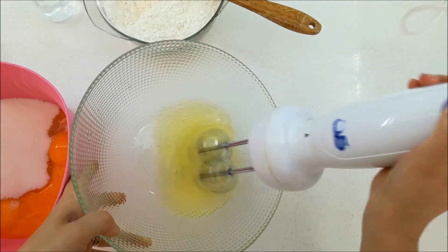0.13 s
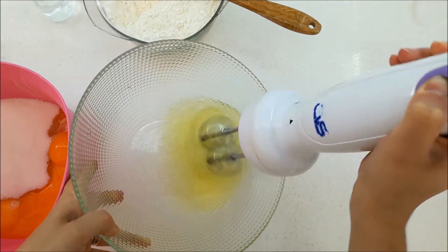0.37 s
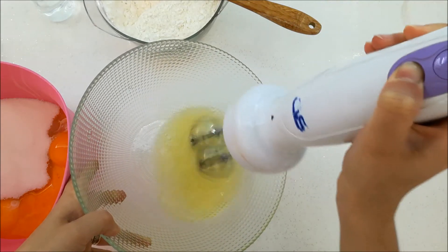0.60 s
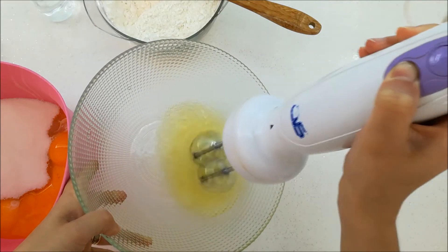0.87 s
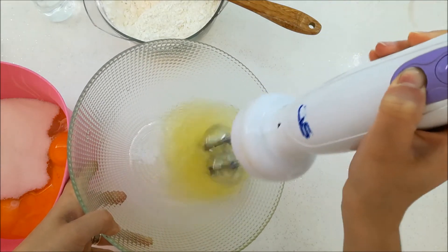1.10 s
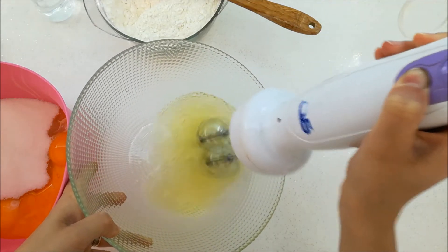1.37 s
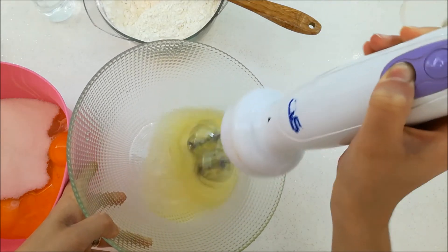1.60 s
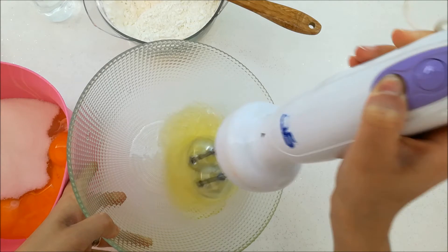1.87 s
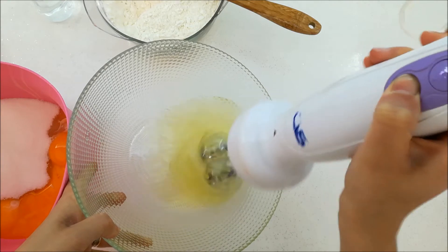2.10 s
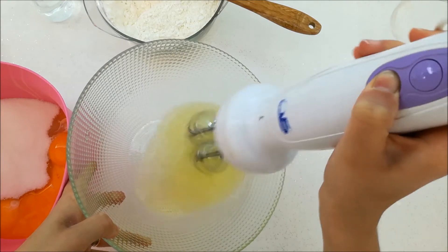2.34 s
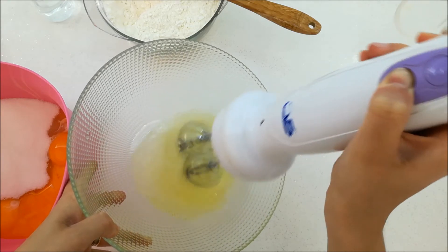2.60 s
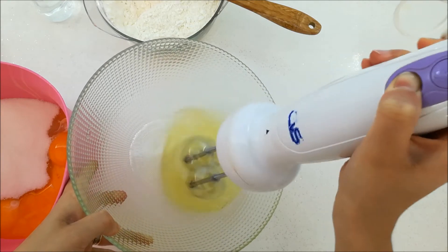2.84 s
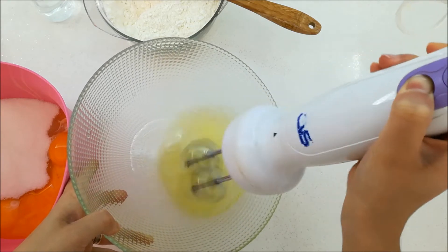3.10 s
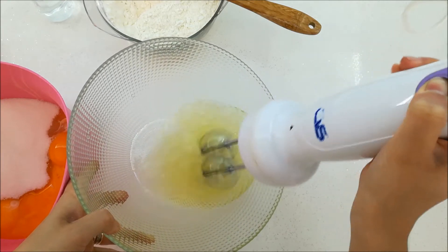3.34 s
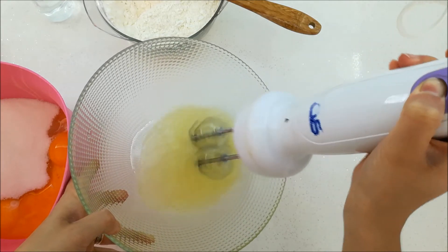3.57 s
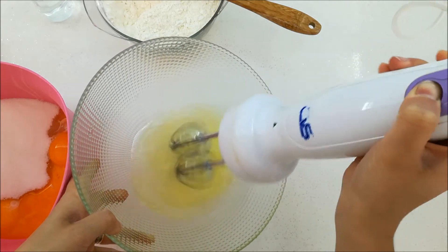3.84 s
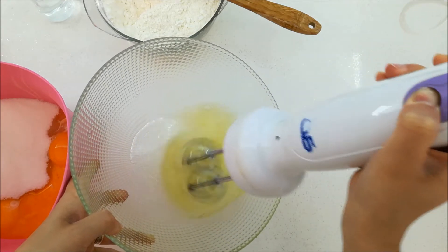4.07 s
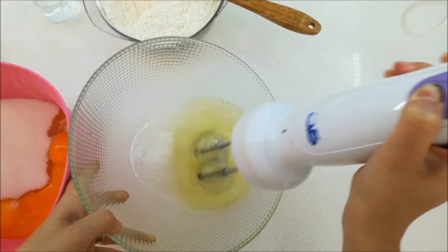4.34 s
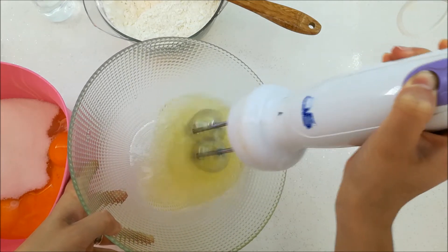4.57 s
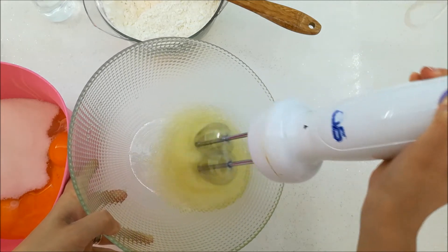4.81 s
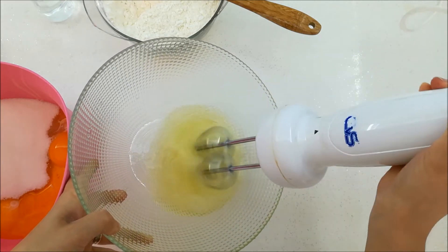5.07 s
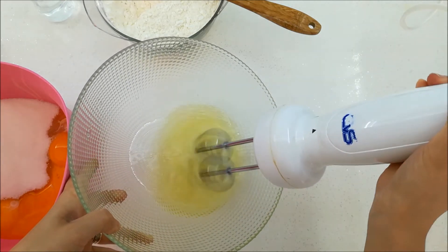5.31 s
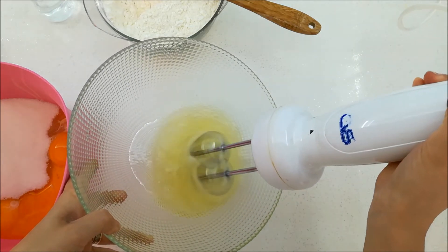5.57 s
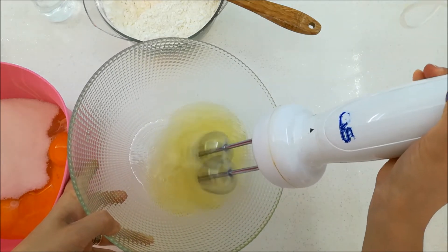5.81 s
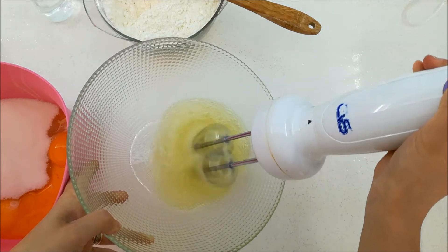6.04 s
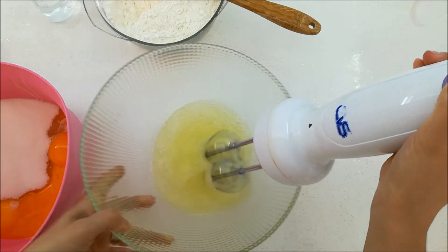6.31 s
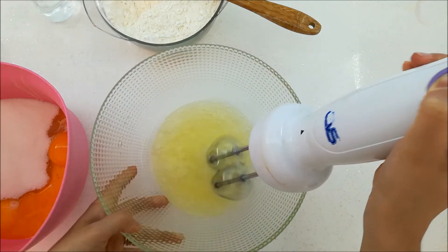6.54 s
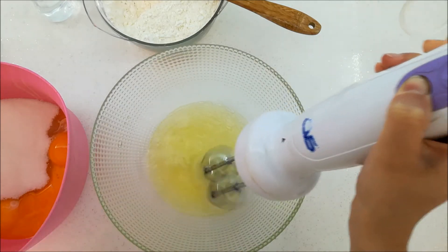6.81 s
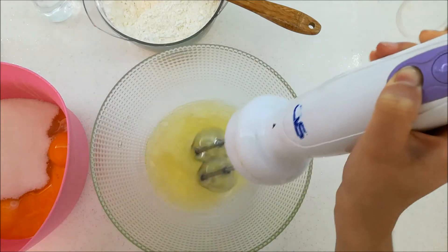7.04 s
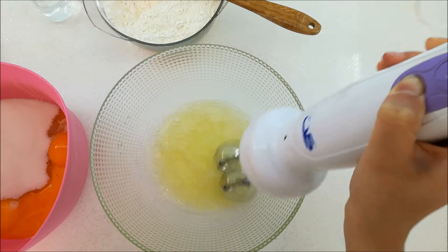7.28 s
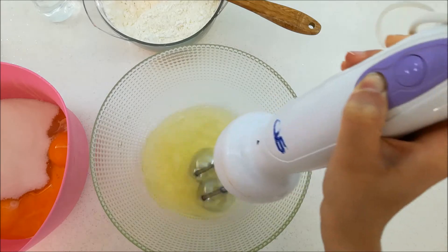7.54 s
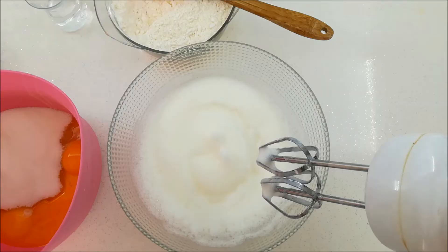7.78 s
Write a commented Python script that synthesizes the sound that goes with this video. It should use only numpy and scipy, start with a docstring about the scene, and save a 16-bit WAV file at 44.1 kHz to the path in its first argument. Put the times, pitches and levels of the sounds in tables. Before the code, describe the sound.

An electric hand mixer whines and hisses steadily, left of centre, its beaters rattling in bursts against a glass bowl before cutting abruptly to near silence.

```python
"""Hand mixer whisking egg whites

An electric hand mixer runs near a pair of microphones, mostly to the left, over a glass bowl.
Its motor whines as sines on shaft orders and hisses as filtered noise in puffs once a turn.
While the beater wires are pressed down, their taps excite resonances of the bowl and the worktop;
hard contacts add knocks and rim pings. At the end the sound is turned down in steps to a quiet kitchen."""
import sys
import numpy as np
from scipy import signal
from scipy.fft import rfft, irfft, next_fast_len
from scipy.io import wavfile
from scipy.ndimage import uniform_filter1d, map_coordinates

SR = 44100
rng = np.random.default_rng(int(sys.argv[2]) if len(sys.argv) > 2 else 0)


def dump(signal):
    """Clip the signal to [-1, 1] and save it as 16-bit WAV at the path in sys.argv[1]."""
    limited = np.clip(np.atleast_2d(signal).T, -1, 1)
    pcm = np.round(limited * 32767).astype(np.int16)
    wavfile.write(sys.argv[1], SR, pcm)


def attenuation_scalar(level_db):
    """Turn a level in dB into a linear amplitude multiplier (20 dB per decade)."""
    decades = np.asarray(level_db, float) / 20
    return 10 ** decades


N = 348831

# Motor shaft: (time [s], rotation rate [turns/s], order favoured by the grip on the housing [1])
SHAFT = [(0, 195.5, 8.5), (.2, 197.4, 8), (.72, 198.7, 9.8), (1.89, 199.2, 9.2), (4.01, 199.8, 9.3),
         (5.32, 199.8, 9), (6.07, 199.8, 8.5), (7.24, 201.6, 8.2), (7.64, 202, 8.2)]
# Beaters pressed on the bowl: (touch [s], lift [s], relative pressure [dB], relative landing knock [dB])
STROKES = [(0, 0.366, -47, -47), (0.599, 0.777, -46.5, -35), (0.901, 1.127, -48, -35.5),
           (1.271, 1.45, -46.5, -36), (1.588, 1.776, -47.5, -43), (1.97, 2.123, -45.5, -32.5),
           (2.149, 2.204, -47.5, -36), (2.313, 2.448, -46, -31), (2.601, 2.75, -48.5, -39.5),
           (2.912, 3.037, -44, -30.5), (3.189, 3.4, -46.5, -30), (3.505, 3.707, -44.5, -31),
           (3.862, 4.057, -49.5, -29.5), (4.171, 4.33, -46, -31.5), (4.501, 6.367, -46.5, -35.5),
           (6.384, 6.54, -47, -23.5), (6.556, 6.987, -51.5, -38), (7.024, 7.296, -49, -39),
           (7.302, 7.912, -52, -46)]
# Likeness of the sound at the two sides: (frequency [Hz], likeness [1])
LIKENESS = [(40, 0.94), (130, 1), (290, 0.85), (640, 0.38), (1500, 0.71), (3100, 0.23), (10000, 0.22),
            (12000, 0.93)]


def unit(x):
    """Normalization to an rms of 1."""
    return x / np.sqrt(np.mean(x ** 2) + 1e-20)


def along(points, hz):
    """Linear interpolation of (frequency [Hz], value) points on a logarithmic frequency axis."""
    f, v = np.transpose(points)
    return np.interp(np.log(hz + 1), np.log(f + 1), v)


def curves(rows):
    """Linear interpolation in time: one value per sample for each column after the time."""
    s, *columns = np.transpose(rows)
    return [np.interp(np.arange(N) / SR, s, column) for column in columns]


def wobble(rate):
    """Band-limited random fluctuation: a smooth curve through random knots, rate of them a second."""
    coarse = np.arange(0, N + SR // 1000, SR // 1000)  # about one point a millisecond
    knots = rng.standard_normal(int(N * rate / SR) + 5)
    return np.interp(np.arange(N), coarse, map_coordinates(knots, [coarse * rate / SR]))


def white():
    """White noise: independent random samples for two channels."""
    return rng.standard_normal((2, N))


def filtered(x, response):
    """Linear filtering: the spectrum of x times a complex response of frequency."""
    m = next_fast_len(N + SR // 4)
    return irfft(rfft(x, m) * response(np.fft.rfftfreq(m, 1 / SR)), m)[..., :N]


def ringing(x, modes):
    """Modal superposition: causal damped resonances with alternating signs, excited by x."""
    def response(f):
        return sum((-1) ** k * attenuation_scalar(db) * 1j * f * width / (centre ** 2 - f ** 2 + 1j * f * width)
                   for k, (centre, width, db) in enumerate(modes))
    return filtered(x, response)


def hiss(spectrum, noise, patchy_db=0):
    """Partial coherence: sum and difference of two noises give a pair of rms 1 with drifting colour."""
    z = signal.stft(noise, nperseg=256)[2]
    field = uniform_filter1d(rng.standard_normal(z.shape[1:]), size=2, axis=0)  # over frequency
    field = uniform_filter1d(field, size=24)  # over time
    pair = signal.istft(z * attenuation_scalar(patchy_db * unit(field)), nperseg=256)[1][:, :N]

    def response(hz):
        half_angle = np.arccos(np.clip(along(LIKENESS, hz), 0, 1)) / 2
        return attenuation_scalar(along(spectrum, hz)) * [np.cos(half_angle), np.sin(half_angle)]
    mid, side = filtered(pair, response)
    return unit(np.array([mid + side, mid - side]))


def kitchen():
    """Ambient noise: steady broadband noise of the quiet kitchen."""
    # (frequency [Hz], relative density [dB per Hz])
    room = [(25, -4), (45, 2), (130, -7), (300, -17), (1000, -22), (3000, -39)]
    return attenuation_scalar(-76) * hiss(room, white())


def rumble():
    """Low-frequency noise: a steady random rumble beneath the mixer."""
    # (frequency [Hz], relative density [dB per Hz])
    low = [(25, -14.5), (45, 5), (75, -5), (130, 1), (260, -26), (450, -22), (1000, -7.5), (1300, -44.5)]
    return attenuation_scalar(-54.5) * hiss(low, white())


def impulses(events, gain_db):
    """Impulsive excitation: one sample for each (time [s], relative level [dB])."""
    hits = np.zeros(N)
    for s, db in events:
        hits[round(s * SR)] = attenuation_scalar(db + gain_db)
    return hits


def hard_contacts():
    """Impact: hard contacts in mid-stroke and the landing of each stroke, as impulses."""
    # Contacts in mid-stroke: (time [s], relative level [dB])
    knocks = [(.177, -33.5), (.35, -32), (.692, -32), (1.053, -31.5), (3.279, -35), (4.971, -31),
              (6.244, -30), (6.669, -36.5)]
    landings = [(start, db) for start, _, _, db in STROKES]
    return impulses(list(knocks) + landings, 0)


def pressure():
    """Contact force: envelopes on worktop and bowl with a sudden touch and a slower lift."""
    t = np.arange(N) / SR
    touch = np.zeros((2, N))
    for start, lift, db, _ in STROKES:
        ease = np.clip((t - start) / 0.002, 0, 1) * np.clip((lift - t) / 0.13 + .5, 0, 1)
        touch = np.maximum(touch, np.outer(attenuation_scalar([db, db + 2.2]), ease))  # worktop, bowl
    return touch


def wire_taps(wires):
    """Periodic impact with jitter: one tap of uneven size for each wire that passes the glass."""
    # The wire that stands out, row by row worktop and bowl: (extra strength [dB])
    bent_db = [
        [6],
        [1],
    ]
    bent_wire = 1  # which of the four
    at = np.flatnonzero(np.diff(np.floor(wires + .1 * wobble(30))) > 0)
    uneven_db = [[2.4], [1.8]] * rng.standard_normal((2, len(at)))
    taps = np.zeros((2, N))
    taps[:, at] = attenuation_scalar(uneven_db + np.array(bent_db) * (np.round(wires[at]) % 4 == bent_wire))
    return taps


def worktop_shake(wires, touch):
    """Forced vibration: the worktop shakes at the wire rate, more under pressure."""
    level = attenuation_scalar(-64.5) + attenuation_scalar(-8.5) * uniform_filter1d(touch, size=4000)
    return level * attenuation_scalar(2.5 * wobble(5.5)) * np.sin(2 * np.pi * wires)


def worktop_thuds(touch, taps, contacts):
    """Resonance under impact: taps and hard contacts excite the bowl on its stand."""
    # (frequency [Hz], width [Hz], relative level [dB])
    worktop = [(126.7, 10, 5.5), (195.5, 34, -5.5), (233, 42, -9.5)]
    taps = taps + 0.023 * rng.standard_normal(N)
    tapping = touch * taps / np.std(ringing(taps, worktop))
    return ringing(tapping + attenuation_scalar(42) * contacts, worktop)


def rim_pings():
    """Lightly damped resonance: wires catching the rim set off a clear ring of the glass."""
    # Catches: (time [s], relative level [dB])
    pings = [(0.2356, -31.5), (2.087, -34), (4.1788, -33.5), (4.731, -34.5), (4.9037, -34.5), (5.971, -30)]
    # Ring: (frequency [Hz], width [Hz], relative level [dB])
    rim = [(1340, 36, 9)]
    return ringing(impulses(pings, 43), rim)


def glass_bowl(touch, taps, contacts):
    """Modal response to impact and friction: taps, skids and knocks excite the bowl with egg white."""
    # (frequency [Hz], width [Hz], relative level [dB])
    bowl = [(348, 49, -8.5), (514, 88, -6), (640, 42, 1), (744.4, 54, -4.5), (1052, 81, -10)]
    let_go_s, free_db = 6.32, -1  # the steadying hand leaves the rim; the two top modes ring on
    t = np.arange(N) / SR
    t_burst = t[:SR // 20]
    skid = attenuation_scalar(-60 * t_burst / 0.061)  # a wire skids over the ribs for a few ms
    grain = rng.standard_normal(N) + 0.84 * white()  # each side faces another part of the bowl
    friction = (signal.fftconvolve(taps, skid)[:N] + 0.15) * grain
    rattle = friction + attenuation_scalar(26) * taps  # clean tap ahead of the skid
    rattle = touch * rattle / np.std(ringing(rattle, bowl))
    chatter = rng.standard_normal(len(t_burst)) * attenuation_scalar(-15.5 - 60 * t_burst / 0.096)
    blows = attenuation_scalar(34) * contacts
    blows = blows + signal.fftconvolve(blows, chatter)[:N]  # a knock rattles on briefly
    drive = rattle + blows
    free = -attenuation_scalar(free_db) * ringing((t > let_go_s) * drive, bowl[-2:])  # sign as in the whole bowl
    return ringing(drive, bowl) + free


def beaters(turns):
    """Geared rotation: four wires pass the glass each beater turn, with force only while pressed."""
    wires = 4 * turns / 17  # 17 motor turns per beater turn
    touch, taps, contacts = pressure(), wire_taps(wires), hard_contacts()
    return (worktop_thuds(touch[0], taps[0], contacts) + glass_bowl(touch[1], taps[1], contacts)
            + rim_pings() + worktop_shake(wires, touch[0]))


def aim():
    """Source directivity: vent level and left-right gap from the slow hold plus swings on downstrokes."""
    # How the mixer is held: (time [s], relative vent hiss [dB], left over right [dB])
    hold = [(0, -31, 8), (.25, -30, 13), (1.4, -31, 13.5), (2.3, -30.5, 14), (2.8, -31.5, 11),
            (4.45, -32, 11.5), (4.9, -31.5, 8), (6.8, -32.5, 9.5), (7.55, -30, 10.5), (7.66, -31, 7.5)]
    swing_s, late_s = 0.041, 0.042  # Gaussian width of a swing, its delay after the touch
    vent_db, left_db = curves(hold)
    t = np.arange(0, N / SR + .01, .01)
    swing = sum(np.exp(-((t - start - late_s) / swing_s) ** 2 / 2)
                for start, _, _, knock_db in STROKES if knock_db > -44)  # the softest landings give none
    swing = np.interp(np.arange(N) / SR, t, swing)
    return vent_db + 1.5 * swing, left_db + 0.5 * swing  # vents swing to the left


def repeating(turns, share):
    """Cyclic correlation: in two noises each turn of the shaft repeats a share of the turn before."""
    steps = 220  # places around the shaft
    fresh = rng.standard_normal((2, N // steps + 40, steps))
    worn = signal.lfilter([1], [1, -np.clip(share, 0, .9)], fresh, axis=1).reshape(2, -1)
    return np.array([map_coordinates(track, [turns * steps]) for track in worn])


def puffs(turns, depth, grit):
    """Amplitude modulation by rotation: brush and fan noise comes in a puff every turn."""
    pulse = np.cos(2 * np.pi * turns) + .35 * np.cos(2 * np.pi * 2 * turns)
    return np.exp(depth * pulse + grit + 0.025 * wobble(8.8)) * repeating(turns, share=0.19)


def shaft_whine(turns):
    """Harmonic synthesis: sines on shaft orders, each wavering on its own in level and phase."""
    # Lower shaft orders: (order [1], relative level [dB])
    lower = [(3, -57), (4, -57.5), (5, -65), (6, -51.5), (7, -48)]
    favoured = curves(SHAFT)[1]
    # The favoured order is the loudest; a distance of one order costs 2.5 dB
    orders = list(lower) + [(k, -44.5 - 2.5 * (k - favoured) ** 2) for k in range(8, 11)]
    whine = np.zeros((2, N))
    for k, db in orders:
        # Each side hears its own mix of echoes
        level_waver = np.array([wobble(14), wobble(14)])
        phase_waver = np.array([wobble(9), wobble(9)])
        level = attenuation_scalar(db + 3.0 * level_waver * min(k / 7, 1)) * np.sqrt(2)
        whine += level * np.sin(2 * np.pi * (k * turns + 0.022 * k * phase_waver))
    return whine


def motor_noise(turns):
    """Spectral shaping of modulated noise: housing buzz, vent hiss, singing slots and high fizz."""
    # Each spectrum: (frequency [Hz], relative density [dB per Hz])
    housing = [(900, -29), (1150, -5), (1400, 1), (1750, 4), (2100, 2), (2600, -9.5), (3400, -51)]
    vents = [(1470, -22), (2500, -6), (3550, -3.5), (4130, -1), (4750, -2), (5750, -1.5), (7120, -14),
             (8000, -16), (10400, -22), (17600, -120)]
    slots = [(3600, -31.5), (4200, 3.5), (4650, 4), (5100, 3), (5700, -53)]  # air singing in the vent slots
    fizz = [(4120, -15), (7000, 0.5), (10400, -3.5), (13400, -4.5), (15200, 0.5), (15900, -44)]
    vent_db, left_db = aim()
    change_db = vent_db - vent_db.mean()
    grit = 0.08 * wobble(150)  # uneven sparking, shared by all bands
    buzz = attenuation_scalar(-36 + .3 * change_db) * hiss(housing, puffs(turns, 0.15, grit), patchy_db=1.17)
    high = attenuation_scalar(-44.5 + 0.26 * change_db) * hiss(fizz, puffs(turns, 0.1, grit), patchy_db=2.5)
    vent = attenuation_scalar(vent_db + 1.8) * hiss(vents, puffs(turns, 0.23, grit), patchy_db=1.7)
    slot_db = vent_db - 24.5 + 1.48 * left_db  # louder when they face left
    singing = attenuation_scalar(slot_db) * hiss(slots, puffs(turns, 0.15, grit), patchy_db=0.8)
    return buzz + vent + singing + high


def motor(turns):
    """Superposition: tonal shaft orders, noise in puffs and low rumble add up."""
    return shaft_whine(turns) + motor_noise(turns) + rumble()


def microphones(air, bowl):
    """Interaural time and level differences: the left hears the mixer sooner and louder in the treble."""
    # (frequency [Hz], share of the left-right level gap [1])
    gap_share = [(200, 0), (1300, 0.2), (4400, 0.86), (8000, 1.06), (12000, 0.14)]
    # (frequency [Hz], share of the left side's head start [1])
    lead_share = [(200, 0), (1000, 1), (9000, 1), (10500, 0)]
    side = np.array([[1], [-1]])

    def out_of_step(hz):  # the wide bowl reaches both sides out of step
        return np.exp(.6j * side * np.arccos(np.clip(along(LIKENESS, hz), 0, 1)))

    def head_start(hz):  # 0.15 ms between the sides where the share is 1
        return np.exp(1j * np.pi * side * hz * 0.00015 * along(lead_share, hz))
    heard = filtered(air, head_start) + filtered(bowl, out_of_step)
    hz, t, z = signal.stft(heard, SR, nperseg=512)
    share = along(gap_share, hz)[:, None]
    gap_db = share * aim()[1][np.minimum((t * SR).astype(int), N - 1)]
    lean = attenuation_scalar(side[..., None] * gap_db / 2) / np.sqrt(np.cosh(np.log(attenuation_scalar(gap_db))))  # same total power
    # Echoes off hand, bowl and worktop colour each side; the colour drifts as the mixer moves
    bands = uniform_filter1d(rng.standard_normal(z.shape), size=3, axis=1)
    bands = uniform_filter1d(uniform_filter1d(bands, size=90), size=40)
    lean = lean * attenuation_scalar(1.13 * share * unit(bands))
    return signal.istft(z * lean, SR, nperseg=512)[1][:, :N]


def scene():
    """Common rotation: one shaft angle drives mixer and bowl, as both microphones hear them."""
    turns = np.cumsum(curves(SHAFT)[0]) / SR
    return microphones(motor(turns), attenuation_scalar(1) * beaters(turns))


def band_limit(x):
    """A steep low-pass at the top of the band."""
    return signal.sosfilt(signal.butter(12, 16860, fs=SR, output="sos"), x)


def record(dry):
    """Attenuation: the level drops in quick steps, leaving only the quiet kitchen."""
    # (time [s], gain [dB])
    fade = [(7.664, 0.5), (7.666, -10), (7.68, -20), (7.686, -42), (7.725, -41), (7.735, -61)]
    mix = attenuation_scalar(curves(fade)[0]) * dry + kitchen()
    return band_limit(mix)


dry = scene()
out = record(dry)
dump(out)
```